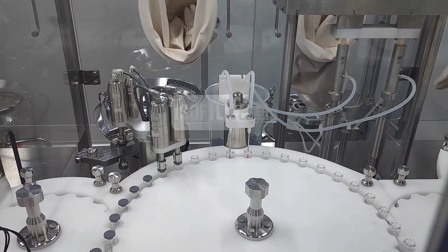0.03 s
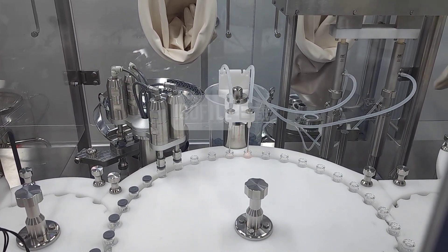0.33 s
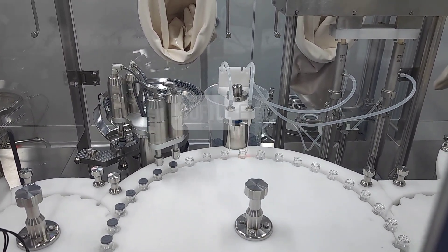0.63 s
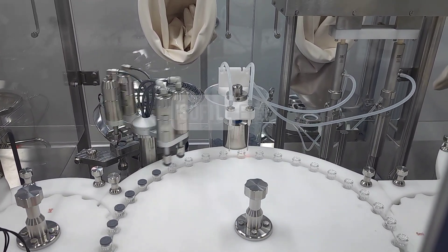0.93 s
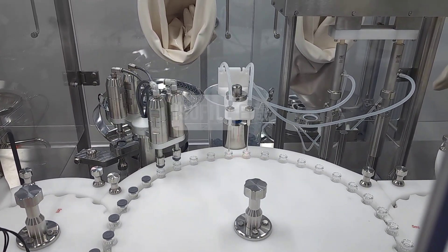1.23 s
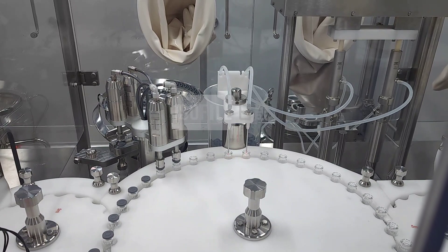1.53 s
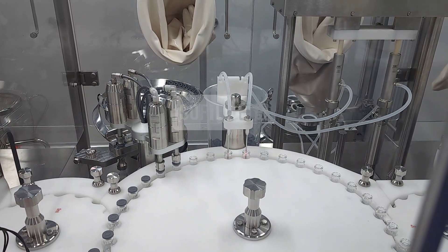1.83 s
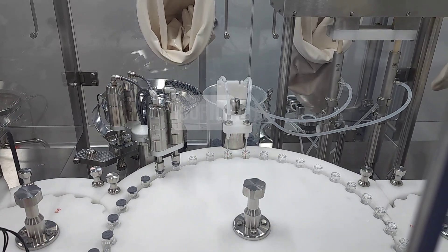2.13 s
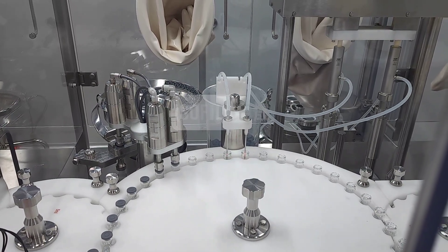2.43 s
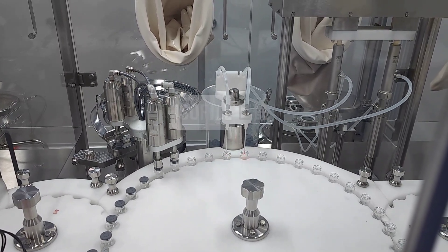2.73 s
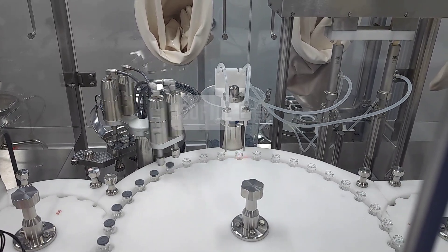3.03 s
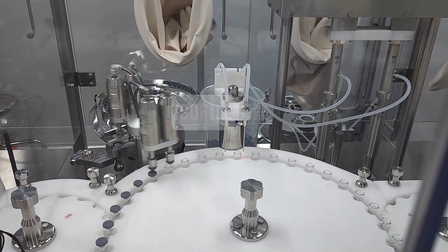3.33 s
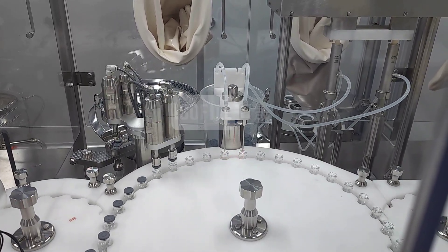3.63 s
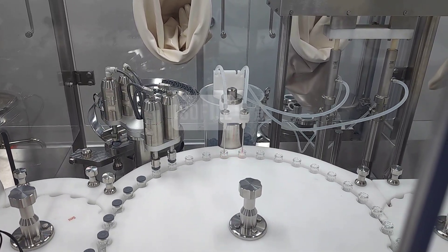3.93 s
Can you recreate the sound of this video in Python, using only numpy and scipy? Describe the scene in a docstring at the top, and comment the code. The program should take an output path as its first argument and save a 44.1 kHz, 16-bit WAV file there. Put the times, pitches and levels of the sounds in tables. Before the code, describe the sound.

Steady ventilation roar and high motor whine from a filling machine, with faint metal clacks.

```python
"""A roar of ventilation and a high servo whine from an enclosed vial filling machine, indoors.
Its motors hum and buzz underneath. A whirring motor runs in spells; between them the capping arm
swings out and back with a rasp and a low thud. Small metal parts clack faintly inside the steel
and glass cabinet. Air, rasp and knocks are shaped noise; motors and drives are wavering tones and noise."""
import sys
import numpy as np
from scipy import signal
from scipy.fft import rfft, irfft
from scipy.io import wavfile

SR = 44100
rng = np.random.default_rng(int(sys.argv[2]) if len(sys.argv) > 2 else 0)


def transcribe(u):
    """Save the signal u as a 16-bit wav file named by the first command-line argument.

    u: samples, shape (n,) or (channels, n), limited to [-1, 1]; the rate is SR.
    q: integer samples, one column per channel.
    """
    v = np.clip(np.atleast_2d(u).T, -1, 1)
    q = np.round(v * 32767).astype(np.int16)
    wavfile.write(sys.argv[1], SR, q)


N = 176400
TIME = np.arange(N) / SR
FREQS = np.fft.rfftfreq(N, 1 / SR)

SWELL_HZ, HUM_WAVER_HZ, WHINE_WAVER_HZ = 8.9, 5.6, 8
SPELL_RISE_S, SPELL_FALL_S = 0.069, 0.077


def amp(db):
    """Decibels to gain."""
    return 10 ** (np.asarray(db) / 20)


def read(points, hz):
    """Interpolate (Hz, value) points on a log-frequency axis."""
    f, value = np.transpose(points)
    return np.interp(np.log(hz + 1), np.log(f + 1), value)


def level(points):
    """Gain over time from (s, dB) points."""
    return amp(np.interp(TIME, *np.transpose(points)))


def drift(rate_hz):
    """Smooth random wander, unit RMS."""
    lowpass = np.exp(-.5 * (FREQS / rate_hz) ** 2) * (FREQS > 0)
    x = irfft(rfft(rng.standard_normal(N)) * lowpass, N)
    return x / x.std()


def pair(a, b, hz, pan_db):
    """Mix two unrelated signals to partly alike channels; pan is left minus right."""
    # Each row: frequency in Hz, left-right correlation before clipping.
    likeness = [(30, -0.6), (85, 1.2), (200, 4.4), (350, 0.85), (520, 0.84), (680, 0.25), (780, 0),
                (950, 0.15), (1100, -.5), (1220, -.5), (1400, -.22), (1700, -0.1), (1950, 0), (2200, -0.4),
                (2600, .15), (3300, -0.11), (3950, 0.18), (4400, 0.03), (8000, -.05), (14000, 0)]
    same = np.clip(read(likeness, hz), -1, 1)
    right = same * a + np.sqrt(1 - same ** 2) * b
    return np.array([a * amp(pan_db / 2), right * amp(-pan_db / 2)])


def noise(spectrum, pan_db=None):
    """Unit-level stereo noise from (Hz, dB) points, falling 33 dB per octave beyond them."""
    # Each row: frequency in Hz, default pan in dB.
    balance = [(60, -2.5), (350, -0.5), (680, 1.5), (1000, 1), (1500, -1.5), (2050, -4.5), (2600, 3.5),
               (3400, -2.5), (4600, -5.5), (7200, -4.5), (8300, 8), (9100, 0), (10500, 2), (14000, -0.5)]
    pan_db = read(balance, FREQS) if pan_db is None else pan_db
    nearest_hz = np.clip(FREQS, spectrum[0][0], spectrum[-1][0])
    octaves_out = abs(np.log2((FREQS + 1) / (nearest_hz + 1)))
    white = pair(*rfft(rng.standard_normal((2, N))), FREQS, pan_db)
    x = irfft(white * amp(read(spectrum, FREQS) - 33 * octaves_out), N)
    return x / x.mean(0).std()


def tone(hz, db, waver, pan_db, waver_hz=WHINE_WAVER_HZ):
    """Stereo tone whose strength and phase wander by the waver share, 0 to 1."""
    steady = np.sqrt(1 - waver ** 2)
    a = steady + waver * (drift(waver_hz) + 1j * drift(waver_hz)) / np.sqrt(2)
    b = 1j * steady + waver * (drift(waver_hz) + 1j * drift(waver_hz)) / np.sqrt(2)
    carrier = np.exp(2j * np.pi * (hz * TIME + rng.random()))
    x = (pair(a, b, hz, pan_db) * carrier).real
    return amp(db) * x / x.mean(0).std()


def gate(rows, rise_s, fall_s):
    """Envelope of (start s, end s, dB) runs: rise, hold, die away in the cabinet."""
    power = 0
    for start, end, db in rows:
        rise = np.clip((TIME - start) / rise_s, 0, 1)
        fall = np.exp(-np.maximum(TIME - end, 0) / fall_s)
        power += (amp(db) * rise * fall) ** 2
    return np.sqrt(power)


def blows(rows, rise_s, fall_s):
    """Envelope of (s, dB) knocks, no hold."""
    return gate([(s, s + rise_s, db) for s, db in rows], rise_s, fall_s)


def ventilation():
    """Moving air: slightly unsteady roar and hiss, faint whistling bands."""
    # Each row: frequency in Hz, relative density in dB.
    roar_spectrum = [(20, -1), (35, -4.5), (58, -5), (75, -1), (110, 0), (135, -0.5), (175, 4), (250, 0),
                     (272, -2), (295, 1.5), (365, -1), (420, -7), (490, -4.5), (640, -5.5), (740, -13),
                     (870, -10.5), (1100, -6), (1250, -21), (1300, -13)]
    hiss_spectrum = [(1200, -14), (1400, -1.5), (1600, -2.5), (2000, 0.5), (2400, -5), (2750, 2.5),
                     (3400, 3), (3700, 4.5), (4180, 3), (4400, -1.5), (5400, -6), (6300, -3.5),
                     (7200, -4.5), (8800, -3), (10000, -6.5), (11800, -6), (13200, -12), (16000, -15)]
    whistle_spectrum = [(8650, -19), (8810, 4), (8950, -30), (11400, -24), (11680, 1), (11900, -25)]
    roar = noise(roar_spectrum) * amp(-31 + 1.48 * drift(SWELL_HZ))
    hiss = noise(hiss_spectrum) * amp(-27.5 + 0.94 * drift(SWELL_HZ))
    return roar + hiss + noise(whistle_spectrum) * amp(-47.5)


def motors():
    """Low tones of fans and motors beat under a drone and a gear buzz."""
    # Each row: pitch in Hz, level in dB (buzz: relative to its noise), waver share, pan in dB.
    hum_tones = [(77.4, -45, .1, -1), (86.6, -28, 0.069, -2), (99.3, -49.5, .2, 3), (120, -49.5, 0.24, -5),
                 (155.2, -37.5, 0.34, 2), (164.2, -41, 0.24, -2), (203.6, -43.5, 0.28, 6.5),
                 (538, -60.5, 0.98, -1), (617, -50, 0.89, 22)]
    buzz_tones = [(1815, -11, 0.87, 0), (1950, -5.5, 0.95, 7), (2048, -6.5, 0.78, -15)]
    # Each row: frequency in Hz, relative density in dB.
    buzz_spectrum = [(1700, -35), (1900, -5), (1980, 1), (2060, 11.5), (2160, -2), (2300, 4)]
    # Each row: time in seconds, level in dB.
    drone_levels = [(0, -46), (.5, -38.5), (1.15, -57), (1.35, -32.5), (1.8, -40), (2.5, -37.5),
                    (3.35, -36.5), (3.68, -34), (4, -54)]
    buzz_levels = [(0, -44.5), (.15, -37), (.4, -48), (.55, -42), (1.1, -38), (1.45, -48), (1.6, -44.5),
                   (2.1, -39.5), (2.3, -45), (2.6, -41.5), (3.3, -38.5), (3.8, -46), (4, -46)]
    hum = sum(tone(*row, HUM_WAVER_HZ) for row in hum_tones)
    drone = tone(hz=232.4, db=0, waver=.2, pan_db=0, waver_hz=HUM_WAVER_HZ)
    buzz = noise(buzz_spectrum, pan_db=-12.5) + sum(tone(*row) for row in buzz_tones)
    return hum + drone * level(drone_levels) + buzz * level(buzz_levels)


def clacks():
    """Small metal parts knock, smeared by the cabinet walls."""
    # Each row: frequency in Hz, relative density in dB.
    spectrum = [(600, -12.5), (1500, -6), (2400, -4), (3400, 0.5), (4200, -0.5), (4750, -0.5), (5080, 3.5),
                (5350, 1), (5550, 0), (5950, -5), (6800, -5), (8500, -26), (15000, -29)]
    # Each row: start in seconds, level in dB.
    knocks = [(.145, -32), (.52, -29), (.69, -31), (.824, -23), (.85, -29), (.965, -24.5), (1.098, -21.5),
              (1.125, -32), (1.93, -26), (2.5, -29.5), (2.74, -36), (3.224, -21.5), (3.255, -31),
              (3.36, -27), (3.505, -27), (3.548, -33)]
    return noise(spectrum, pan_db=-5.5) * blows(knocks, rise_s=.022, fall_s=0.043)


def servo_whine():
    """Strong drive tones take turns over a bed of weaker ones."""
    # Each row: pitch in Hz, pan in dB.
    strong_tones = [(3835, -4), (4008, -12), (4058, 11)]
    # One curve per strong tone. Each point: time in seconds, relative level in dB.
    curves = [
        [(0, -31.5), (.55, -33), (.75, -28), (.92, -45), (1.02, -34), (1.25, -24.5), (1.4, -31), (1.62, -27.5),
         (1.8, -25.5), (2.2, -38), (2.8, -35), (3.0, -24), (3.55, -42), (3.8, -34), (3.93, -28)],
        [(0, -24.5), (.2, -38), (.95, -30.5), (1.6, -37), (2.07, -29), (2.33, -33.5), (2.52, -26.5),
         (2.85, -31), (3.05, -33), (3.25, -41), (3.55, -27.5), (3.73, -31), (4, -35)],
        [(0, -49), (.15, -35), (.56, -26.5), (.92, -36.5), (1.4, -35), (1.75, -51), (2.1, -33), (2.55, -66),
         (3.05, -37), (3.4, -29.5), (3.9, -41)],
    ]
    # Each row: pitch in Hz, relative level in dB, waver share, pan in dB.
    weak_tones = [(3710, -52, .7, 3), (3893, -46.5, .7, 0), (3956, -45.5, .6, -4), (4114, -46, .7, 3),
                  (7663, -43, .9, -9), (7775, -42, .9, -5), (7845, -45, .9, -9), (7963, -39, .8, -5),
                  (8187, -44, .9, -9)]
    strong = sum(tone(hz, db=-4.5, waver=.22, pan_db=pan_db) * level(curve)
                 for (hz, pan_db), curve in zip(strong_tones, curves))
    return strong + amp(-0.1) * sum(tone(*row) for row in weak_tones)


def servo_sizzle():
    """Switching sizzle an octave above the whine, with brief tonal flares."""
    # Each row: frequency in Hz, relative density in dB.
    spectrum = [(7300, -43), (7540, -20), (7640, 0.5), (7780, -4), (7900, 0), (7970, -3), (8070, -9),
                (8185, -12), (8260, -13), (8600, -35)]
    # Each row: start and end in seconds, pitch in Hz, level in dB.
    flares = [(2.76, 2.84, 8183, -31.5), (3.02, 3.073, 7667, -28), (3.828, 3.88, 7963, -32)]
    pan_db = -8.5
    sizzle = noise(spectrum, pan_db) * amp(-30.5 - 0.4 * drift(SWELL_HZ))
    for start, end, hz, db in flares:
        envelope = gate([(start, end, 0)], rise_s=.022, fall_s=0.043)
        sizzle += tone(hz, db, waver=.22, pan_db=pan_db) * envelope
    return sizzle


def servo_wind_down():
    """One drive slows; its pitch sags."""
    # Each row: time in seconds, pitch in Hz.
    glide = [(1.48, 3880), (1.57, 3845), (1.64, 3800), (1.8, 3790)]
    # Each row: start and end in seconds, level in dB.
    runs = [(1.48, 1.66, -33)]
    pitch_hz = np.interp(TIME, *np.transpose(glide))
    return np.sin(2 * np.pi * np.cumsum(pitch_hz) / SR) * gate(runs, SPELL_RISE_S, SPELL_FALL_S)


def whirring_motor():
    """A rough whirr and one clear gear tone start and stop with each spell."""
    # Each row: frequency in Hz, relative density in dB.
    spectrum = [(550, -23), (800, -6), (850, -6.5), (920, -2), (1080, -5), (1190, 0.5), (1280, -8),
                (1450, -7), (1700, -18), (2000, -18), (2300, -9), (2700, -30)]
    # Each row: gear pitch in Hz, level in dB relative to the noise, waver share, pan in dB.
    whirr_tones = [(1012, -10, .6, 0), (1079, -7, .5, -2), (1200, -13, .6, 2)]
    # Each row: start and end in seconds, whirr gain in dB, clear tone level in dB.
    spells = [(-.1, 0.59, -37, -48.5), (1.5, 2.127, -36.5, -40), (2.34, 3.013, -37, -46.5),
              (3.888, 4.1, -36, -44)]
    whirr = noise(spectrum) + sum(tone(*row) for row in whirr_tones)
    gear = tone(hz=959, db=0, waver=0.23, pan_db=10)
    motor = 0
    for start, end, whirr_db, gear_db in spells:
        envelope = gate([(start, end, 0)], SPELL_RISE_S, SPELL_FALL_S)
        motor += (amp(whirr_db) * whirr + amp(gear_db) * gear) * envelope
    return motor


def capping_arm():
    """The arm rasps through a resonance while it moves; the mechanism thuds softly."""
    # Each row: frequency in Hz, relative density in dB.
    rasp_spectrum = [(1200, -29), (1450, -13.5), (1900, -17), (2350, -20), (2620, -8), (2800, -6),
                     (2920, 4), (3030, -13), (3170, -3.5), (3400, -14), (3700, -11.5), (4400, -22.5),
                     (7000, -26), (12000, -47)]
    # Each row: start and end in seconds, level in dB.
    strokes = [(.63, .69, -33), (.685, .745, -25.5), (.825, .93, -26), (.945, 1.05, -25.5),
               (1.05, 1.185, -26), (1.19, 1.23, -35), (3.05, 3.09, -24.5), (3.14, 3.39, -26.5),
               (3.46, 3.655, -28), (3.505, 3.53, -25)]
    # Each row: multiple of the thud's pitch, relative density in dB.
    thud_shape = [(.45, -38), (.8, -2), (1, 2.5), (1.2, -5.5), (1.8, -15), (3.6, -17)]
    # Each row: start in seconds, pitch in Hz, level in dB.
    thuds = [(.3, 326, -33), (.84, 337, -28), (1.31, 238, -31), (3.23, 297, -27)]
    flutter = amp(1.95 * drift(rate_hz=40))
    arm = noise(rasp_spectrum, pan_db=0.1) * flutter * gate(strokes, rise_s=0.005, fall_s=0.042)
    for start, hz, thud_db in thuds:
        body = noise([(hz * multiple, db) for multiple, db in thud_shape])
        arm += body * blows([(start, thud_db)], rise_s=0.031, fall_s=0.074)
    return arm


def scene():
    """The whole machine, in stereo."""
    background = ventilation() + motors()
    servos = servo_whine() + servo_sizzle() + servo_wind_down()
    return background + servos + whirring_motor() + capping_arm() + clacks()


def record(dry):
    """Steep low-pass on the top treble."""
    cutoff_hz = 15800
    lowpass = signal.firwin(801, cutoff_hz, window=("kaiser", 9), fs=SR)
    return signal.oaconvolve(dry, lowpass[None], "same")


dry = scene()
out = record(dry)
transcribe(out)
```